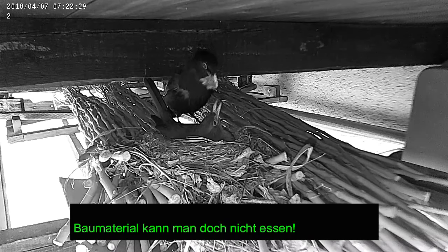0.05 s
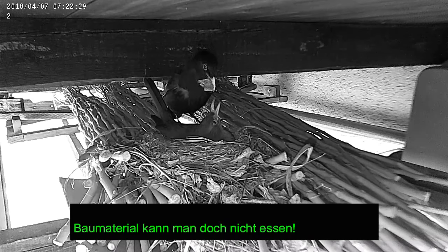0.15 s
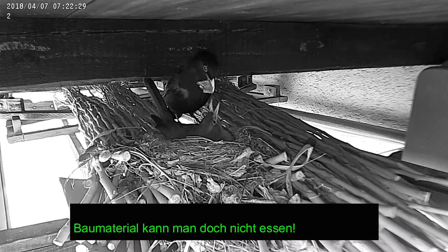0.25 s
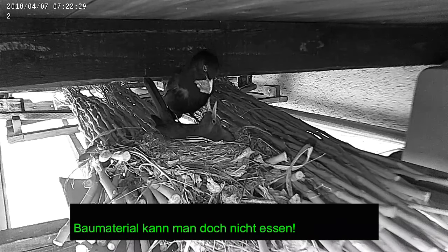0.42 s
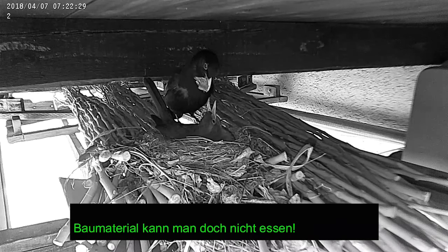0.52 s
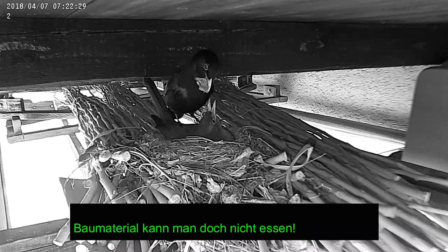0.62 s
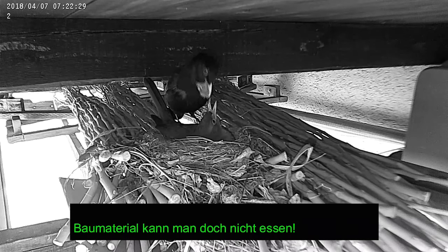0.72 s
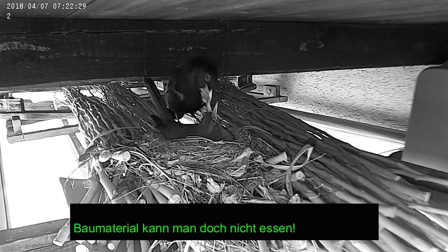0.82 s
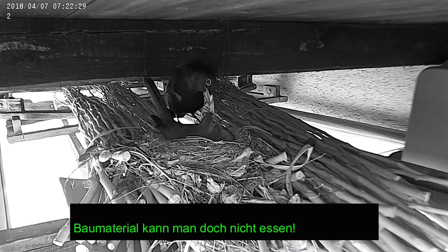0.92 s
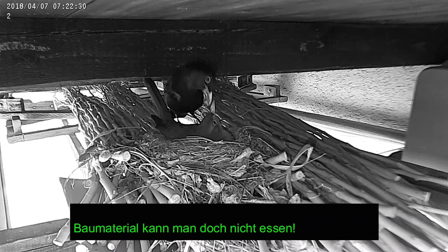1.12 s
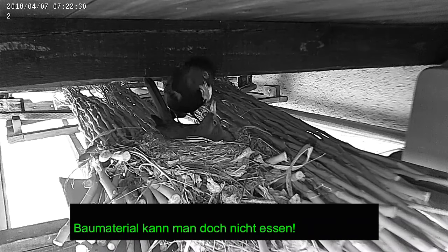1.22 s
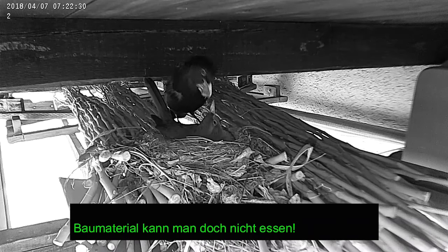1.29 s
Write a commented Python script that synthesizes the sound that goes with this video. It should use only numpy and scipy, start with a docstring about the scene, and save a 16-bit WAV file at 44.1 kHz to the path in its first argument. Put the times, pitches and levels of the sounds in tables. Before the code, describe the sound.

Four brief, evenly spaced blackbird chirps sound close by, with soft rumble and hiss behind.

```python
"""Four short clucking chirps from a blackbird at its nest under a wooden roof, over low rumble and hiss.
Each chirp is a nearly pure tone whose pitch arches up and falls. Beams and wall return discrete echoes;
the eaves and, faintly, the yard reverberate. A small camera close by doubles the sound, suppresses the
middle range in the quiet, and samples slowly, which mirrors each chirp into the treble."""
import sys
import numpy as np
from scipy import signal
from scipy.fft import rfft, irfft
from scipy.io import wavfile
from scipy.ndimage import uniform_filter1d, map_coordinates

SR = 44100
rng = np.random.default_rng(int(sys.argv[2]) if len(sys.argv) > 2 else 0)


def unload_wav(signal):
    """Save mono or channel-first audio to the path in sys.argv[1] as 16-bit WAV at rate SR, clipped to [-1, 1]."""
    wavfile.write(
        sys.argv[1],
        SR,
        np.round(np.clip(np.atleast_2d(signal).T, -1, 1) * 32767).astype(np.int16),
    )


N = 59535
YARD_T60_S, YARD_DELAY_S = 0.93, .025


def blackbird():
    """Superposition: each chirp arrives directly, then as early reflections, then as reverberation."""
    # start_s, length_s, level_db, first_hz, top_hz, last_hz, rising_share, thinning_db
    chirps = [(0.2083, 0.01177, -25, 1020.0, 1781, 1023, 0.26, 3.5),
              (0.4185, 0.01366, -28.5, 1285, 2079, 1215, 0.35, 10.5),
              (0.6452, 0.0154, -30, 1089, 2266, 1060, 0.36, 9),
              (0.8935, 0.0139, -29.5, 1527, 2142, 1122, 0.18, 2.1)]
    # a row per chirp, as the moving head changes the paths off nest, beams and wall: five of delay_s
    echo_delays = [(0.00263, 0.00705, 0.01084, 0.01205, 0.01492),
                   (0.00352, 0.00707, 0.00941, 0.01124, 0.01641),
                   (0.00439, 0.00708, 0.01012, 0.0112, 0.01651),
                   (0.00581, 0.00686, 0.01032, 0.01152, 0.01852)]
    # one per path: gain_db
    echo_gains = [-12.5, -11, -10, -12, -22]
    voice, echoes = np.zeros(N), np.zeros(N)
    for (start_s, *shape), delays in zip(chirps, echo_delays):
        sound = chirp(*shape)
        add(voice, start_s, sound)
        for delay_s, gain_db in zip(delays, echo_gains):
            add(echoes, start_s + delay_s, amp(gain_db) * sound)
    return throat(voice + echoes + eaves_and_yard(voice) + scattering(voice))


def chirp(length_s, level_db, first_hz, top_hz, last_hz, rising_share, thinning_db):
    """Frequency and amplitude modulation: a tone flicks up, thins at the top, then falls and swells."""
    # air noise in the tone: frequency_hz, density_db
    rasp = [(700, -14.5), (1000, -1), (1500, 0), (2200, -1), (2700, -7), (3300, -27), (3800, -18.5)]
    attack_s, release_s, swell_db = .0021, .0028, 5.5
    t = np.arange(0, length_s, 1 / SR)
    progress = t / length_s
    before_top = np.maximum(1 - progress / rising_share, 0)
    after_top = np.maximum((progress - rising_share) / (1 - rising_share), 0)
    pitch_hz = top_hz - (top_hz - first_hz) * arch(before_top) - (top_hz - last_hz) * arch(after_top)
    phase = 2 * np.pi * np.cumsum(pitch_hz) / SR
    tone = np.sin(phase) + amp(-49) * np.sin(2 * phase) + amp(-22) * noise(rasp)[:len(t)]
    height = np.clip((pitch_hz - last_hz) / (top_hz - last_hz), 0, 1)
    envelope_db = level_db + swell_db * (progress - 1) + thinning_db * (.5 - height ** 2)
    attack = np.sin(np.pi / 2 * np.minimum(t / attack_s, 1))
    release = np.sin(np.pi / 2 * np.minimum((length_s - t) / release_s, 1)) ** 2
    return attack * release * amp(envelope_db) * tone


def arch(distance, roundness=1.704, flattening_rad=1.243):
    """Glide contour: the share of the pitch drop at a distance of 0 to 1 from the top."""
    return np.abs(np.sin(flattening_rad * distance) / np.sin(flattening_rad)) ** roundness


def throat(x, cutoff_hz=990):
    """High-pass filtering: the throat passes little below its range."""
    hz = np.fft.rfftfreq(N, 1 / SR) + 1
    return irfft(rfft(x) / np.sqrt(1 + (cutoff_hz / hz) ** 12), N)


def eaves_and_yard(voice):
    """Reverberation in two spaces: a short ring under the eaves and a long, faint one in the yard."""
    # response of both tails: frequency_hz, gain_db
    tail_colour = [(700, -10), (1200, -2.5), (1700, -1), (2100, 5), (2500, 5), (3200, 12), (4000, -5)]
    eaves = amp(-14.5) * reverb(voice, t60_s=.11, delay_s=.012)
    yard = amp(-23) * reverb(voice, YARD_T60_S, YARD_DELAY_S)
    return coloured(eaves + yard, tail_colour)


def reverb(x, t60_s, delay_s):
    """Convolution with sparse random reflections that decay by 60 dB in t60_s."""
    t = np.arange(N) / SR
    taps = rng.choice([-1., 1.], N) * (rng.random(N) < .1) * amp(-60 * t / t60_s)
    return delayed(signal.fftconvolve(x, taps / np.linalg.norm(taps))[:N], delay_s)


def scattering(voice):
    """Diffuse scattering: far reflections blur into noise that follows the calls and decays with the yard."""
    # scattered sound: frequency_hz, density_db
    wash = [(700, -13), (1100, -2.5), (1400, -0.5), (2000, -1.5), (2400, -6.5), (2900, -13.5),
            (3800, -22.5)]
    decay = amp(-60 * np.arange(N) / SR / YARD_T60_S) ** 2
    power = np.abs(signal.fftconvolve(voice ** 2, decay / decay.sum())[:N])
    return amp(-20.5) * delayed(np.sqrt(power), YARD_DELAY_S) * noise(wash)


def background():
    """Broadband ambient noise: distant rumble, and faint hiss with random amplitude modulation."""
    # low rumble: frequency_hz, density_db
    rumble = [(15, -18.5), (27, -0.5), (48, 0.5), (68, -4), (85, -3), (115, -9), (170, -14.5), (280, -19),
              (400, -22), (500, -27), (1000, -44.5)]
    # hiss: frequency_hz, density_db
    hiss = [(200, -15), (600, -2), (1100, 2), (1700, -1.5), (2400, -0.5), (3000, -2.5), (3500, -3),
            (4000, -7.5)]
    flicker_db = 1.5 * noise([(1, 3.5), (12, 4), (40, -5.5), (80, -38)])
    return amp(-63.5) * noise(rumble) + amp(-70 + flicker_db) * noise(hiss)


def doubled(x, copy_db, lead_s=.0173):
    """Comb filtering: the camera's weaker, earlier copy ticks before each chirp and makes noise hollow."""
    return x + amp(copy_db) * delayed(x, -lead_s)


def suppressor(x, threshold_db=-40, hold_s=.17, fade_s=.037):
    """Noise gating: the middle range is turned down when nothing loud has sounded for a while."""
    # response of the closed gate: frequency_hz, gain_db
    quiet_colour = [(500, 1), (1000, -6.5), (1800, -5.5), (2500, -2.5), (3200, 0.5), (4000, 2)]
    t = np.arange(N) / SR
    loud = uniform_filter1d((x ** 2).mean(0), size=441) > amp(threshold_db) ** 2
    since_loud_s = t - np.maximum.accumulate(np.where(loud, t, -1))
    opened = uniform_filter1d((since_loud_s < hold_s) * 1., round(fade_s * SR))
    return opened * x + (1 - opened) * coloured(x, quiet_colour)


def noise(spectrum):
    """Spectral shaping of white noise by (frequency_hz, density_db) points, scaled to an rms of 1."""
    hz, db = np.transpose(spectrum)
    shape_db = np.interp(np.log(np.fft.rfftfreq(N, 1 / SR) + 1), np.log(hz), db, right=-100)
    shaped = irfft(rfft(rng.standard_normal(N)) * amp(shape_db), N)
    return shaped / np.sqrt(np.mean(shaped ** 2) + 1e-20)


def coloured(x, response):
    """Zero-phase filtering by (frequency_hz, gain_db) points."""
    hz, db = np.transpose(response)
    gain_db = np.interp(np.log(np.fft.rfftfreq(2 * N, 1 / SR) + 1), np.log(hz), db)
    return irfft(rfft(x, 2 * N) * amp(gain_db))[..., :N]


def amp(db):
    """Decibels to amplitude ratio."""
    return 10 ** (np.asarray(db) / 20)


def add(mix, start_s, sound):
    """Superposes a sound on the mix from start_s."""
    part = mix[round(start_s * SR):][:len(sound)]
    part += sound[:len(part)]


def delayed(x, delay_s):
    """Time shift: later by delay_s, earlier if negative."""
    return np.interp(np.arange(N) - delay_s * SR, np.arange(N), x, left=0, right=0)


def scene():
    """Bird and background sum at one microphone, the same in both channels."""
    mono = doubled(blackbird(), copy_db=-16) + doubled(background(), copy_db=-5.5)
    return np.array([mono, mono])


def record(dry):
    """Spectral imaging: slow samples joined by straight lines mirror the gated sound into the treble."""
    sampling_hz, band_edge_hz = 8000, 15400
    t, ticks = np.arange(N) / SR, np.arange(0, N / SR, 1 / sampling_hz)
    samples = [map_coordinates(channel, [ticks * SR], mode="nearest") for channel in suppressor(dry)]
    joined = np.array([np.interp(t, ticks, channel) for channel in samples])
    low_pass = signal.firwin(255, band_edge_hz, window=("kaiser", 8), fs=SR)
    return signal.oaconvolve(joined, low_pass[None], "same")


dry = scene()
out = record(dry)
unload_wav(out)
```